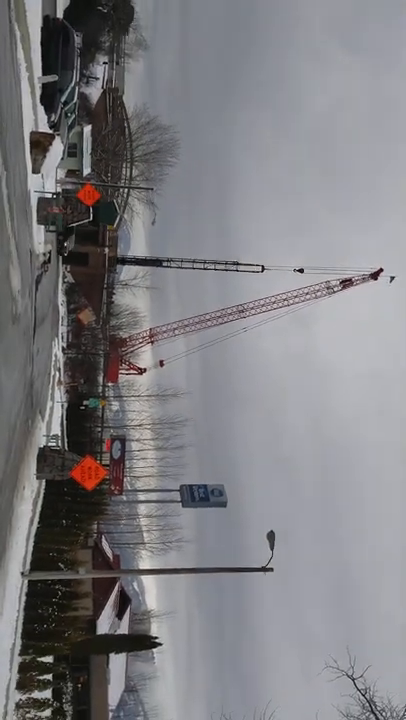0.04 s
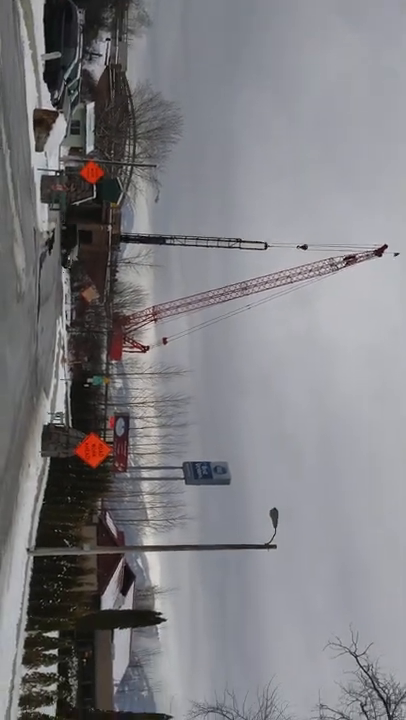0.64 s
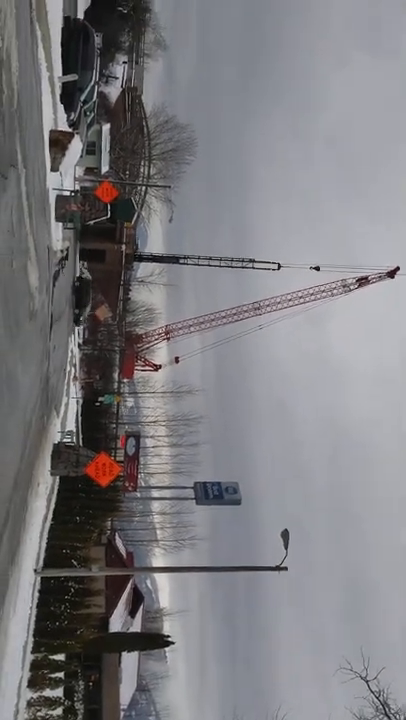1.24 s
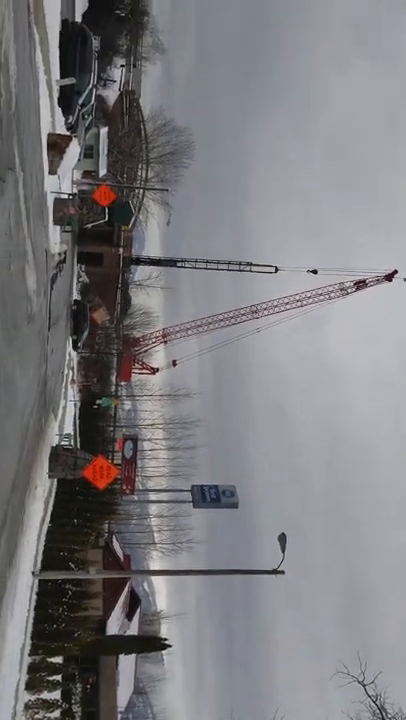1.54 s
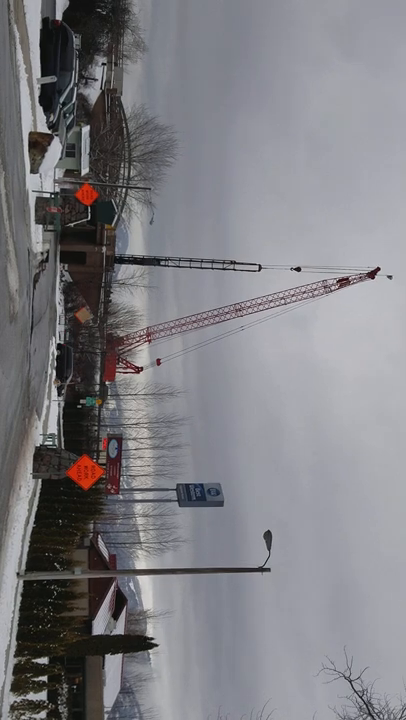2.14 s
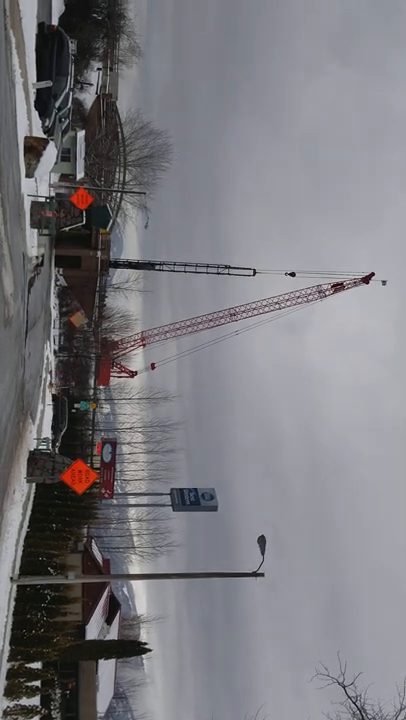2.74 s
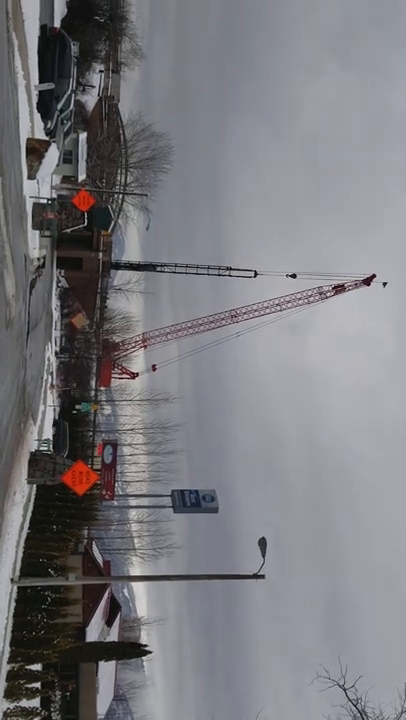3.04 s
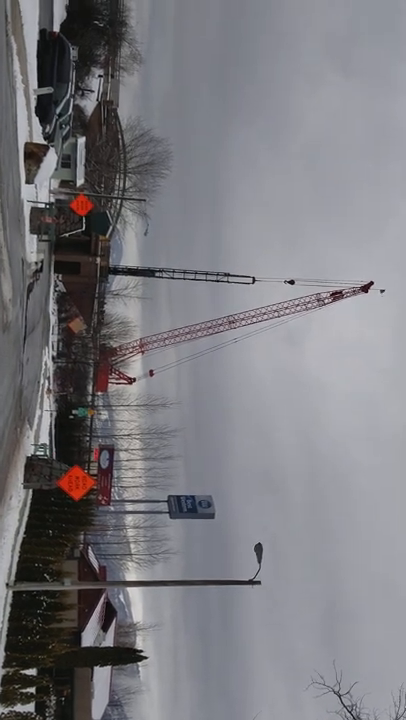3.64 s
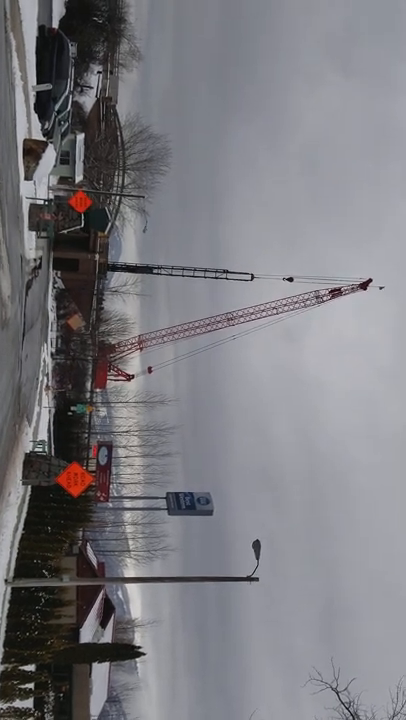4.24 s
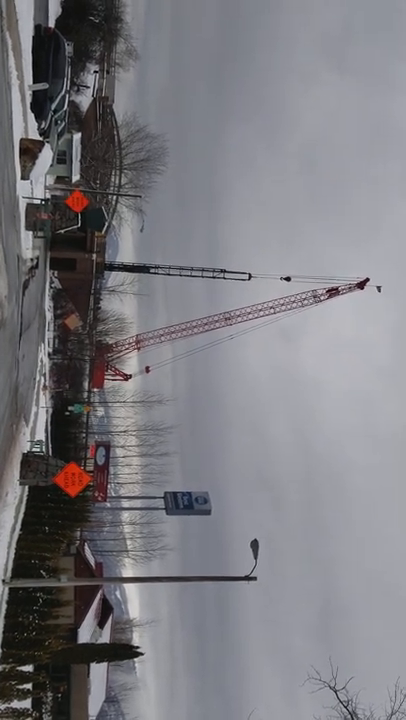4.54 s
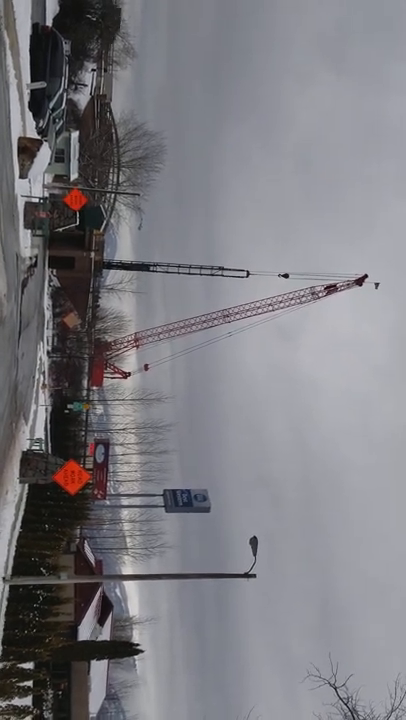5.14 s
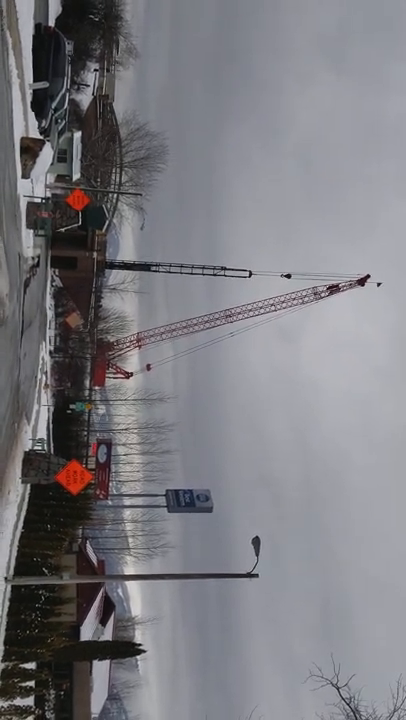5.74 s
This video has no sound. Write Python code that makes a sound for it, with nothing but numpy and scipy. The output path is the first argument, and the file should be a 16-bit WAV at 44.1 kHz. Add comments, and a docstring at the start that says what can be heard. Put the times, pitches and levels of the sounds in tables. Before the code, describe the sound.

A diesel pile hammer works some way off on an open street, heard in stereo over a low town rumble. It strikes a steel pile four times, at about 0.6, 2.0, 3.4 and 4.9 seconds. A short rush of air swells just before each blow. Then comes a loud, sharp crack with a ground thud and a dense metallic clang, and the pile rings on until the next strike. A tenth of a second after each hit the exhaust barks and hisses, strongest on the second and third, followed by a light steel rattle. Houses and trees return echoes and a long tail. A car hisses softly past on the wet road, nearest around 0.8 seconds and gone by about 3. Faint wind and a few small dull bumps touch the microphone. The rumble eases as the last ring fades toward 5.8 seconds.

```python
"""A diesel pile hammer on an open winter street, some way off and a little off the stereo microphone's axis.
Over a low town rumble, the falling ram blows air from its ports, then strikes: a crack, a ground thud,
and the steel pile clangs and sings on. A tenth of a second later the exhaust barks, then the hammer
rattles in its guides. Houses and trees throw it all back. Four blows come, about 1.4 s apart;
during the first two, a car hisses past on the wet road."""
import sys
import numpy as np
from scipy import signal
from scipy.fft import rfft, irfft, next_fast_len
from scipy.io import wavfile
from scipy.ndimage import uniform_filter1d, minimum_filter1d

SR = 44100
rng = np.random.default_rng(int(sys.argv[2]) if len(sys.argv) > 2 else 0)


def master_out(mix):
    """Clip the mix to full scale and print it as 16-bit PCM to the path in sys.argv[1]."""
    frames = np.transpose(np.atleast_2d(mix))
    ceiling = np.clip(frames, -1, 1)
    pcm = np.round(ceiling * 32767).astype(np.int16)
    wavfile.write(sys.argv[1], SR, pcm)


N = 256220
TIME = np.arange(N) / SR
TAIL = TIME[:int(1.6 * SR)]   # time axis of one ring-out

# ram on anvil, a row a blow: t/s, clang/dB, brightness/dB, ground thud/dB, singing/dB
BLOWS = [(0.6293, -7.5, -5, -19.5, -30.5), (2.0160, -7, 1, -26, -28.5), (3.4206, -9, 0, -30.5, -31.5),
         (4.8512, -9.5, 1, -21.5, -34)]
# the ram's rebound, a row a blow: exhaust bark/dB, exhaust hiss/dB, thump/dB, rattle/dB
REBOUNDS = [(-18, -31.5, -17.5, -34.5), (-10, -23, -23, -41.5), (-10, -21.5, -21, -46),
            (-17.5, -27.5, -21.5, -35)]
# width of sound reaching the microphone from all around: f/Hz, side minus mid/dB
WIDE = [(25, -2), (55, -11), (100, -25), (150, -27), (280, -22.5), (380, -7.5), (580, -12.5), (800, -5.5),
        (1250, 0.5), (2200, -5), (4500, -1.5), (8000, -2.5), (15000, 5.5)]


def cracks():
    """The ram meets the anvil: a few heavily damped modes sound first."""
    # modes of anvil and helmet: f/Hz, level/dB, t60/s
    anvil_modes = [(240.5, -14, 0.037), (444, -18, .05), (925, -18, 0.015), (1303, -14.5, 0.017),
                   (1400, 0.5, 0.022), (2253, -17, 0.11), (2450, -12, 0.14), (2805, -18, 0.1),
                   (3940, -31, 0.074), (4360, -33, 0.051), (6700, -43.5, .04)]
    out = np.zeros((2, N))
    crack = ring(anvil_modes, rise_s=.0009, spread_db=0)
    for s, _, bright_db, _, _ in BLOWS:
        add(out, s, brighten(crack, bright_db))
    return out


def impacts(fresh_share=0.79, build_s=0.0096, thud_t60=0.39, thud_build_s=0.012):
    """The steel's dense clang builds up, partly the same from blow to blow; the ground thuds."""
    # the crowd of close steel modes: f/Hz, level/dB
    clang_spectrum = [(30, -38.5), (60, -21), (100, -8.5), (160, -6), (290, -5.5), (385, -12), (500, -4.5),
                      (620, -1), (950, 0.5), (1600, -3.5), (1800, -6.5), (2450, -8), (3450, -27.5),
                      (4600, -28), (7200, -46.5), (8800, -59.5), (15000, -77)]
    # their decay: f/Hz, t60/s
    clang_t60 = [(80, 0.53), (300, 0.78), (900, 0.54), (2400, 0.74), (5000, 0.8), (12000, 0.38)]
    thud_spectrum = [(30, -26), (60, -11.5), (95, 3), (160, -4.5), (350, -19), (2000, -93)]   # f/Hz, level/dB
    out = np.zeros((2, N))
    steel = noise(clang_spectrum, size=len(TAIL))
    shudder = np.tanh(TAIL / thud_build_s) ** 2 * decay(thud_t60)
    for s, clang_db, bright_db, thud_db, _ in BLOWS:
        fresh = noise(clang_spectrum, size=len(TAIL))
        dense = np.sqrt(1 - fresh_share) * steel + np.sqrt(fresh_share) * fresh
        clang = from_db(clang_db) * die_away(dense, clang_t60, build_s)
        thud = from_db(thud_db) * shudder * noise(thud_spectrum, size=len(TAIL))
        add(out, s, brighten(clang, bright_db) + thud)
    return out


def pile(ring_db=7.0, soil_damping=1.015):
    """The pile's strong modes ring on, damped by the soil that grips it."""
    # long-ringing modes: f/Hz, level/dB, t60/s before soil damping
    pile_modes = [(92, -30, 1.11), (144, -28, 1.38), (253, -31, 1.23), (281, -25, 1.04), (306, -30, 1.36),
                  (578, -26, 1.4), (614, -26, 1.31), (644, -25, 1.08), (762, -24, 0.8), (799, -27, 0.85),
                  (904, -23, 0.83), (963, -21, 0.72), (1069, -23, 0.73), (1098, -21, 0.75),
                  (1200, -25, 0.84), (1346, -25, 0.84), (1384, -25, 0.82), (1409, -25, 0.82),
                  (1470, -25, 0.81), (1534, -27, 0.84), (1588, -27, 0.86), (1635, -27, 0.85),
                  (1923, -25, 0.71), (2293, -24, 0.67), (2456, -21, 0.71), (2811, -30, 0.72)]
    damped = [(hz, db, t60 / soil_damping) for hz, db, t60 in pile_modes]
    out = np.zeros((2, N))
    for s, clang_db, bright_db, _, _ in BLOWS:
        ringing = ring(damped, rise_s=.012, spread_db=2)
        add(out, s, from_db(clang_db + ring_db) * brighten(ringing, bright_db))
    return out


def singing(hz=598, step_hz=19, t60=2.59, swell_s=0.25):
    """A tight cluster of pile modes beats and sings between the blows."""
    out = np.zeros((2, N))
    cluster = [(hz + k * step_hz, -12 * abs(k) ** 1.6) for k in range(-4, 5)]
    envelope = decay(t60) * np.tanh(TAIL / swell_s)
    for s, *_, sing_db in BLOWS:
        add(out, s, from_db(sing_db) * noise(cluster, size=len(TAIL)) * envelope)
    return out


def exhaust(after_s=0.1098, thump_delay_s=0.011, spit_db=-53):
    """The rising ram opens the ports and burnt gas puffs out: a bark, a jet's hiss, a thump, a thin spit."""
    # the four parts of the puff: f/Hz, level/dB
    bark_spectrum = [(50, -29.5), (110, -26), (260, -5), (400, -19), (700, -8.5), (1150, -2.5), (1500, 2),
                     (1800, -1.5), (2350, -1), (2800, -5), (3600, -25), (9000, -72)]
    jet_spectrum = [(1500, -27), (2900, -8), (3550, -3.5), (4500, 0.5), (5500, -7.5), (6700, -8.5),
                    (8500, -29), (12800, -43), (15500, -54.5)]
    thump_spectrum = [(40, -21.5), (130, 0), (280, -1.5), (420, -12.5), (2000, -83.5)]
    spit_spectrum = [(4000, -13.5), (9000, 0), (12800, -3.5), (13500, -11.5), (15500, -14)]
    bark, jet, thump, spit = np.zeros((4, N))
    for (blow_s, *_), (bark_db, hiss_db, thump_db, _) in zip(BLOWS, REBOUNDS):
        s = blow_s + after_s
        flow = puff(s, open_s=.012, close_s=.01)
        bark += from_db(bark_db) * flow
        jet += from_db(hiss_db) * flow
        thump += from_db(thump_db) * puff(s + thump_delay_s, open_s=.0085, close_s=.0085)
        spit += from_db(spit_db) * puff(s, open_s=.015, close_s=.015)
    return (thump * noise(thump_spectrum) + spit * noise(spit_spectrum)
            + bark * noise(bark_spectrum) + jet * noise(jet_spectrum))


def rattles(jolt_after_s=0.1984, tick_s=0.27, tick_db=-56):
    """Steel chatters on steel as the hammer jolts in its guides; one faint tick precedes the first blow."""
    # lighter shakes around each jolt: t/s after the blow, level/dB
    shakes = [(0.16, -42), (0.307, -46.5)]
    chatter_spectrum = [(500, -15), (2300, 5), (3500, 3.5), (4400, 2), (7000, -10.5),
                        (8800, -22.5), (12800, -35.5), (15000, -50.5)]   # f/Hz, level/dB
    shaking = from_db(tick_db) * puff(tick_s, open_s=.007, close_s=.007)
    for (blow_s, *_), (*_, rattle_db) in zip(BLOWS, REBOUNDS):
        for after_s, db in [(jolt_after_s, rattle_db), *shakes]:
            shaking += from_db(db) * puff(blow_s + after_s, open_s=.014, close_s=.017)
    return shaking * noise(chatter_spectrum, width=WIDE)


def downstrokes(spurt_lead_s=0.056):
    """The falling ram drives air from the ports: a puff, a hissing rush, a spurt through the last gap."""
    # a row a fall: first puff t/s, puff/dB, rush/dB, hiss/dB, spurt/dB
    falls = [(0.33, -48, -39.5, -62, -71), (1.715, -44.5, -38.5, -56.5, -62),
             (3.102, -40.5, -35.5, -54.5, -50.5), (4.504, -43, -39, -59.5, -53)]
    # body and hiss of the escaping air: f/Hz, level/dB
    rush_spectrum = [(100, -2.5), (260, 6.5), (390, -6.5), (800, 2.5), (1100, 2.5), (1500, 0), (1800, -7.5),
                     (2150, -3), (2350, -1.5), (2650, -11.5), (3500, -28.5), (9000, -68)]
    hiss_spectrum = [(2500, -8.5), (3700, 2.5), (4600, 4), (5500, -7.5), (7000, -4.5), (8400, -24),
                     (13000, -29), (15500, -34)]
    rush, hiss = np.zeros((2, N))
    for (blow_s, *_), (puff_s, puff_db, rush_db, hiss_db, spurt_db) in zip(BLOWS, falls):
        first_puff = from_db(puff_db) * puff(puff_s, open_s=.009, close_s=.022)
        rush_flow = from_db(rush_db) * port_flow(blow_s, step_db=4.5, swell_db_per_s=52, shut_db=2)
        hiss_flow = from_db(hiss_db) * port_flow(blow_s, step_db=5, swell_db_per_s=95, shut_db=6.5)
        spurt = from_db(spurt_db) * puff(blow_s - spurt_lead_s, open_s=.009, close_s=.009)
        rush += np.hypot(rush_flow, first_puff)
        hiss += np.hypot(hiss_flow, spurt)
    return rush * noise(rush_spectrum) + hiss * noise(hiss_spectrum)


def port_flow(blow_s, step_db, swell_db_per_s, shut_db, step_s=.012, full_lead_s=0.19, shut_lead_s=0.09):
    """Air flow in one fall: it swells, steps up to full, holds, and chokes as the ram covers the ports."""
    early_s = np.maximum(blow_s - full_lead_s - TIME, 0)
    covered = np.maximum(1 + (TIME - blow_s) / shut_lead_s, 0)
    flow_db = -swell_db_per_s * early_s - step_db * np.tanh(early_s / step_s) - shut_db * covered
    return (TIME < blow_s) * from_db(flow_db)


def bearing(x, lag_s=.00003):
    """The hammer stands a little off the microphone's axis: the sides differ in arrival and colour."""
    # toward the hammer: f/Hz, left minus right/dB
    balance = [(200, -.2), (700, -.8), (1300, -1.2), (2400, .6), (4400, -1.6), (8100, 4), (12000, 1.8)]
    size = next_fast_len(N + SR)
    hz = np.fft.rfftfreq(size, 1 / SR)
    left = from_db(at_hz(balance, hz) / 2) * np.exp(1j * np.pi * hz * lag_s)
    return irfft(rfft(x, size) * np.array([left, 1 / left]), size)[:, :N]


def street(x, scatter_db=-10.0, arrive_s=0.042, smear_s=0.014):
    """House fronts give two smeared echoes, trees and hedges a long scattered tail from all sides."""
    # colour of the tail: f/Hz, level/dB
    tail_spectrum = [(60, -2.5), (150, 2.5), (600, 0.5), (1500, -2.5), (2500, -4), (5000, 0), (14000, -0.1)]
    # its decay: f/Hz, t60/s
    tail_t60 = [(80, 1), (300, 2.5), (650, 2), (1500, 1.65), (2600, 1.64), (5000, 0.61), (8000, 0.82),
                (14000, .5)]
    # house fronts: delay/s, level/dB
    echoes = [(0.048, -18), (0.096, -21)]
    scattered = noise(tail_spectrum, size=len(TAIL), width=WIDE)
    response = die_away(scattered, tail_t60, smear_s) * np.tanh(TAIL / arrive_s)
    response *= from_db(scatter_db) / np.sqrt(np.sum(response ** 2) * 2)
    for delay_s, db in echoes:
        wall = rng.standard_normal(len(TAIL)) * np.exp(-abs(TAIL - delay_s) / smear_s)
        response += from_db(db) * wall / np.linalg.norm(wall)
    return signal.fftconvolve(x.mean(axis=0, keepdims=True), response, axes=1)[:, :N]


def town():
    """The town rumbles all around the microphone, easing off toward the end."""
    # colour of the rumble: f/Hz, level/dB
    rumble_spectrum = [(20, -15), (45, -3), (110, -1.5), (280, -5), (385, -13.5), (590, -3.5), (800, -7),
                       (1150, -8.5), (1600, -11.5), (2550, -23), (3300, -34.5), (4800, -41.5),
                       (8200, -60.5), (15000, -66.5)]
    # its course: t/s, level/dB
    rumble_level = [(0, -41), (1.5, -43), (3, -41.5), (4.3, -45.5), (5.3, -47.5), (5.8, -48)]
    gain = from_db(np.interp(TIME, *np.transpose(rumble_level)))
    return gain * noise(rumble_spectrum, width=WIDE)


def tyres(near_s=0.78, leaves_s=2.51, car_db=-45, far_traffic_db=-72):
    """One car's hiss swells, sags slowly while it is near, and fades into that of far traffic."""
    # tyres on the wet road: f/Hz, level/dB
    tyre_spectrum = [(500, -3.5), (1500, 17), (3400, -1), (4600, 0.5), (5600, -9), (7200, -14),
                     (8500, -27.5), (15000, -27.5)]
    coming_s, passing_s, going_s = np.maximum([near_s - TIME, TIME - near_s, TIME - leaves_s], 0)
    car = from_db(car_db - 27 * coming_s - 5.5 * passing_s - 40 * going_s)   # slopes in dB/s
    return np.hypot(car, from_db(far_traffic_db)) * noise(tyre_spectrum, width=WIDE)


def bumps():
    """Small dull bumps at the microphone, each one damped resonance."""
    # a row a bump: t/s, f/Hz, level/dB, t60/s
    microphone_bumps = [(0.228, 104, -27.5, 0.081), (1.352, 900, -36, 0.045), (2.646, 234, -33.5, 0.2),
                        (3.045, 60, -32, .12)]
    out = np.zeros((2, N))
    for s, hz, db, t60 in microphone_bumps:
        add(out, s, ring([(hz, db, t60)], rise_s=.003, spread_db=0))
    return out


def breeze(db=-54, gust_db=1.5):
    """Light wind buffets the microphone in short lumps."""
    wind_spectrum = [(15, -17), (45, -6), (90, 0), (250, -19), (2000, -80)]   # f/Hz, level/dB
    lumps = np.interp(TIME, np.linspace(0, TIME[-1], 70), rng.standard_normal(70))
    return from_db(db + gust_db * lumps) * noise(wind_spectrum, width=[(30, -11), (200, -14)])


def noise(spectrum, size=N, width=None):
    """Coloured stereo noise of rms 1, narrow unless a width is given."""
    # width of sound straight from the hammer: f/Hz, side minus mid/dB
    narrow = [(40, -19), (65, -25), (100, -44), (170, -46), (290, -42), (380, -17.5), (550, -27),
              (1000, -17), (2400, -10), (3500, -4.5), (5000, -5.5), (8000, -3), (15000, 3)]
    padded = next_fast_len(size)
    hz = np.fft.rfftfreq(padded, 1 / SR)
    mid, side = rfft(rng.standard_normal((2, padded))) * from_db(at_hz(spectrum, hz))
    spread = from_db(at_hz(width or narrow, hz))
    left_right = (mid + spread * side * [[1], [-1]]) / np.hypot(1, spread)
    x = irfft(left_right, padded)[:, :size]
    return x / x.std()


def ring(modes, rise_s, spread_db):
    """Decaying sines build up as the wave spreads; phases are random, levels scatter by spread_db."""
    chance = rng.standard_normal((len(modes), 2))
    out = sum(from_db(db + spread_db * weight) * decay(t60) * np.sin(2 * np.pi * hz * TAIL + np.pi * phase)
              for (hz, db, t60), (weight, phase) in zip(modes, chance))
    return out * np.tanh(TAIL / rise_s) ** 2


def die_away(x, t60s, build_s):
    """Overlapping bands swell and fade at their own rates; lows build up later, as bending waves do."""
    hz = np.fft.rfftfreq(len(TAIL), 1 / SR)
    spectrum, out = rfft(x), 0
    for centre, t60 in t60s:
        band = at_hz([(f, float(f == centre)) for f, _ in t60s], hz)
        swell = 1 - np.exp(-TAIL / (build_s * min(1, 900 / centre)))
        out += irfft(spectrum * band) * swell * decay(t60)
    return out


def brighten(x, db, corner_hz=1800):
    """A treble shelf: the harder the contact, the brighter."""
    treble = signal.sosfilt(signal.butter(1, corner_hz, "high", fs=SR, output="sos"), x)
    return x + (from_db(db) - 1) * treble


def puff(s, open_s, close_s):
    """A bell-shaped envelope around time s."""
    width_s = np.where(TIME < s, open_s, close_s)
    return np.exp(-.5 * np.minimum(((TIME - s) / width_s) ** 2, 100))


def decay(t60):
    """A fall of 60 dB in t60 seconds."""
    return np.exp(-np.log(1000) * TAIL / t60)


def from_db(db):
    """Decibels to gain."""
    return 10 ** (np.asarray(db) / 20)


def at_hz(points, hz):
    """Read a table on a log-frequency axis."""
    f, value = np.transpose(points)
    return np.interp(np.log(np.maximum(hz, 1)), np.log(f), value)


def add(out, s, sound):
    """Mix a sound in at time s."""
    i = round(s * SR)
    out[:, i:i + sound.shape[-1]] += sound[..., :N - i]


def scene(microphone_hiss_db=-82.0):
    """The hammer's broad noises fill the street; the steel tones come straight to the microphone."""
    hammer = impacts() + exhaust() + rattles() + downstrokes()
    tones = cracks() + pile() + singing()
    background = town() + tyres()
    hiss = from_db(microphone_hiss_db) * rng.standard_normal((2, N))
    return bearing(hammer + tones) + street(hammer) + background + bumps() + breeze() + hiss


def record(dry, cutoff_hz=15500):
    """Behind the microphone a fast limiter holds the peaks at full scale; the top is cut."""
    allowed_gain = 1 / np.maximum(abs(dry).max(axis=0), 1)
    held_gain = minimum_filter1d(allowed_gain, size=240)
    gain = uniform_filter1d(uniform_filter1d(held_gain, size=120), size=120)
    return signal.sosfilt(signal.ellip(10, .1, 80, cutoff_hz, fs=SR, output="sos"), dry * gain)


dry = scene()
out = record(dry)
master_out(out)
```